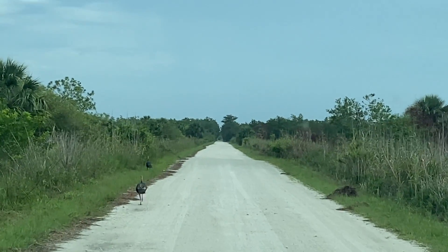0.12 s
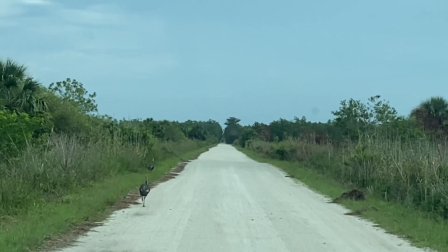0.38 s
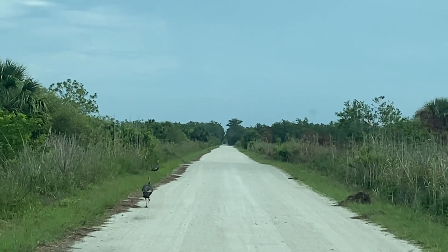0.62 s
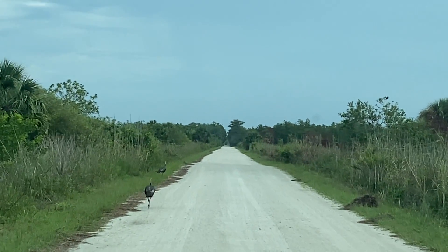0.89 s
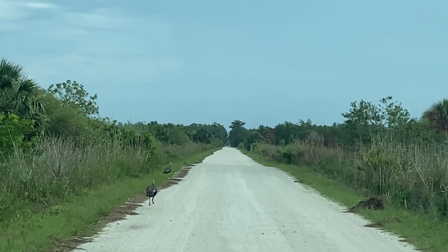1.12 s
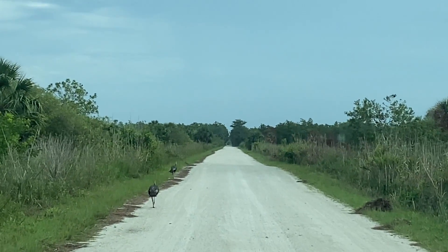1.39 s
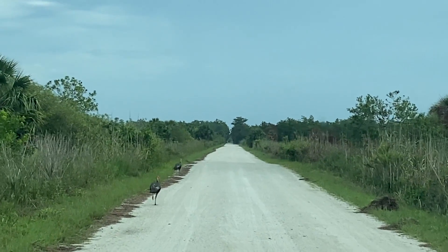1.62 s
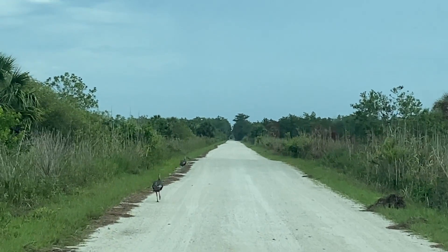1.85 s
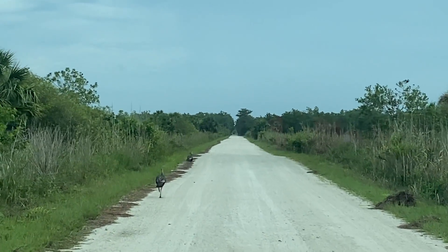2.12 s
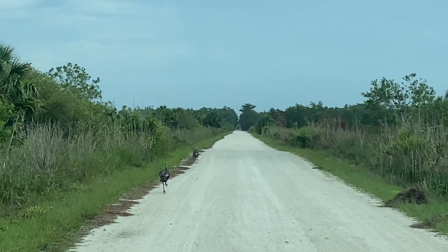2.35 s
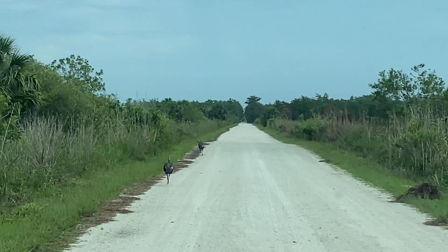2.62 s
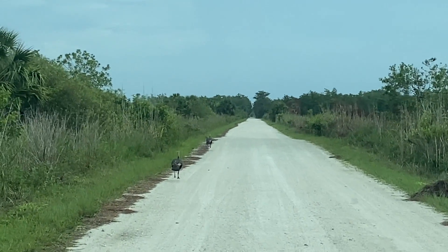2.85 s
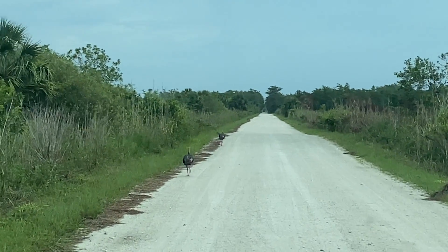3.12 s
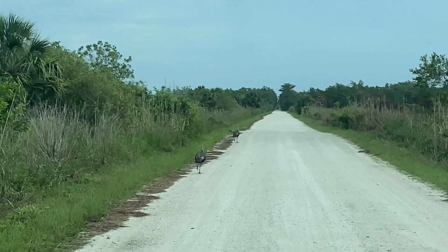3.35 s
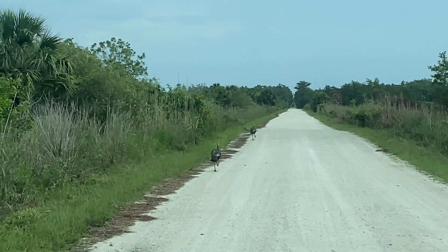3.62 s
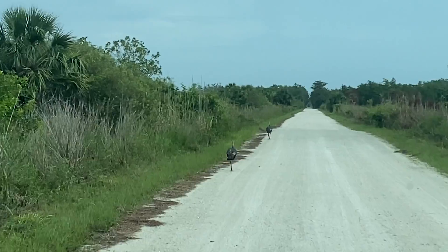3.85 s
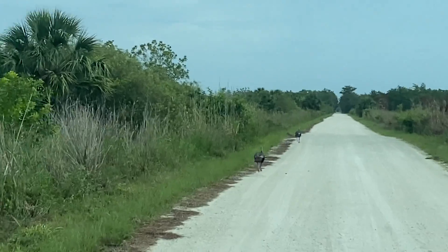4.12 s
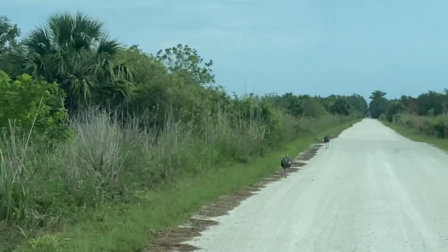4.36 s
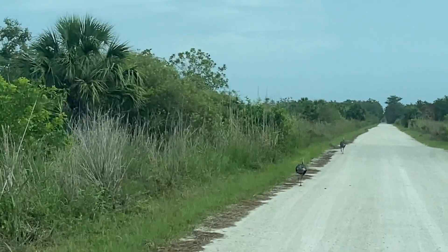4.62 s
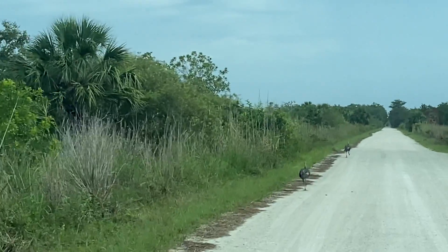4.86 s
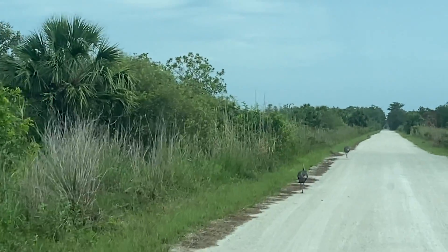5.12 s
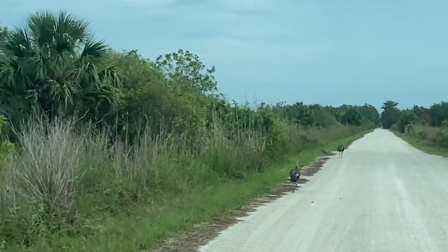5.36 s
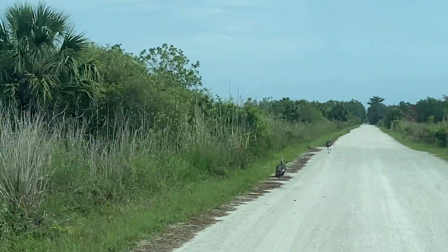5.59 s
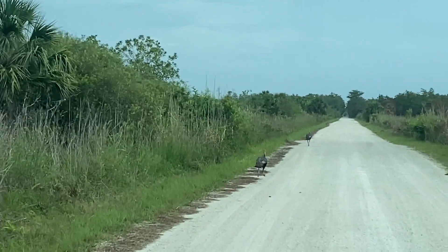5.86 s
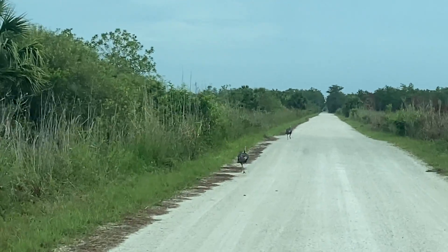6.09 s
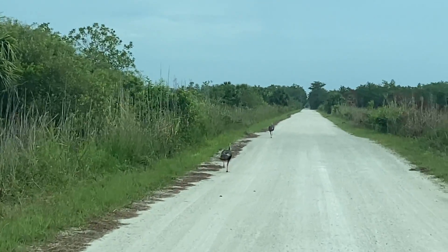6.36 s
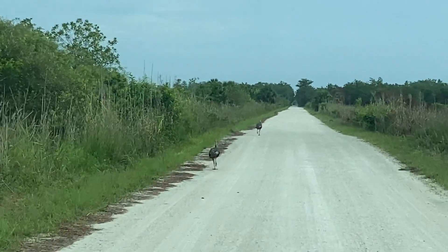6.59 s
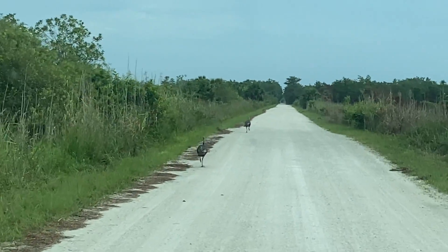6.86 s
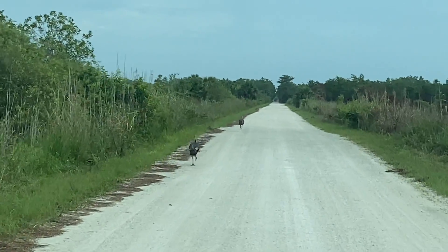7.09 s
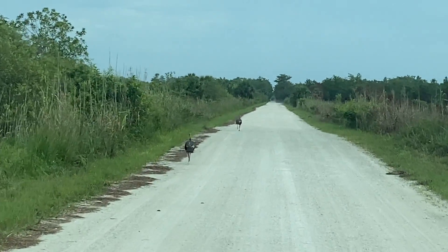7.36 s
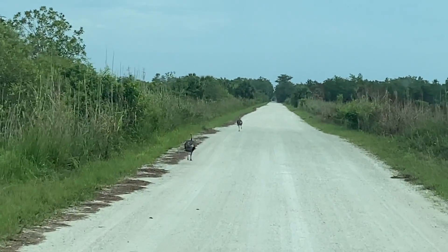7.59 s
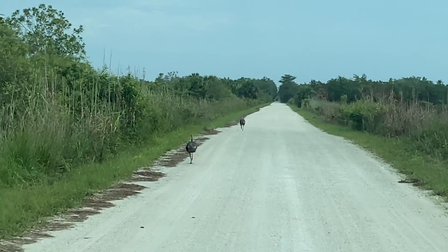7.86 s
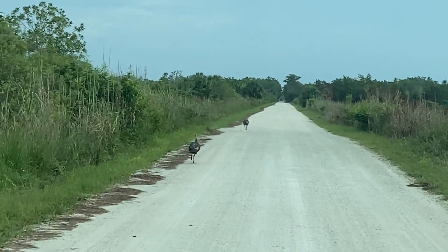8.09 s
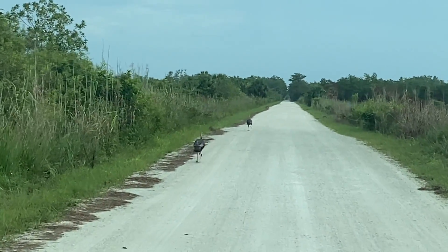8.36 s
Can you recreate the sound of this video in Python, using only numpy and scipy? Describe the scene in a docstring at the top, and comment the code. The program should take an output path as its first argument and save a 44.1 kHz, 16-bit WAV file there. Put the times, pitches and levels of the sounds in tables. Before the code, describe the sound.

A car's interior, heard on a phone behind the windscreen as it creeps along gravel. Throughout, deep, boomy body rumble and softer drumming dominate, over steady blower air, hollow cabin resonance and faint flickering hiss. A brighter hiss swells at the very start and fades within about a second. Faint high insect chirps dot the first 2.3 s, with three short rising calls, perhaps a distant bird, at about 0.6, 1.1 and 1.7 s. Rumble swells briefly near 1.1, 5.1 and 7.1 s. A small crisp cluster of ticks and stone pings falls around 2.3-2.5 s; isolated light ticks follow. The engine hum, nearly buried at first, strengthens from 2 s, wavers around 4-5 s, then grows fuller and slightly higher to the end. Dull gravel knocks and tiny pings come at 7.1-7.4 s, fainter knocks near 8 s, beneath a thin insect whine.

```python
"""Car creeping along a gravel road

Heard from a phone held behind the windscreen. Firing-order sines hum as the engine gains load; resonated
noise is the body shaken by the road, with brief swells and slight dips. Shaped noise is blower air, ringing
cabin resonances. Faint buzzing tones are insects and rising calls outside; decaying bursts and short notes
are ticks near the phone and stones on the underside. A flickering top hiss lies behind."""
import sys
import numpy as np
from scipy import signal
from scipy.fft import rfft, irfft
from scipy.io import wavfile
from scipy.ndimage import uniform_filter1d

SR = 44100
rng = np.random.default_rng(int(sys.argv[2]) if len(sys.argv) > 2 else 0)


def inscribe(sig):
    """Save sig as 16-bit PCM at rate SR to the path in sys.argv[1].

    A 1-D sig is mono; a 2-D sig holds one channel per row.
    Samples are clipped to [-1, 1] before scaling.
    """
    pcm = np.round(np.clip(np.atleast_2d(sig).T, -1, 1) * 32767)
    wavfile.write(sys.argv[1], SR, pcm.astype(np.int16))


def boost_factor(decibels):
    """Convert a level in decibels to a linear amplitude factor."""
    exponent = np.asarray(decibels, float) / 20
    return 10 ** exponent


N = 373520
T = np.arange(N) / SR
HZ = np.fft.rfftfreq(N, 1 / SR)


def curve(table, column):
    """One column of a time table at every sample."""
    table = np.array(table)
    return np.interp(T, table[:, 0], table[:, column])


def over_hz(table):
    """A (Hz, value) table at every frequency, straight on a log axis."""
    hz, value = np.transpose(table)
    return np.interp(np.log(HZ + 1), np.log(hz), value)


def unit(x):
    """Scale to rms 1."""
    return x / np.sqrt(np.mean(np.abs(x) ** 2))


def walk(rate_hz):
    """Random levels held 1 / rate_hz seconds, smoothed twice; rms 1."""
    step = 100
    hold = int(SR / step / rate_hz)
    held = rng.standard_normal(N // 1000)[np.arange(N // step) // max(hold, 11)]
    slow = unit(uniform_filter1d(uniform_filter1d(held, hold), hold))
    return np.interp(T, np.arange(len(slow)) * step / SR, slow)


def ring(hz, width_hz):
    """Noise through a resonance applied twice, as a rotating pointer of rms 1 in its real part."""
    # each pass is wider, so that the pair has about the stated width
    pole = np.exp((2j * np.pi * hz - np.pi * 1.5 * width_hz) / SR)
    lead_in = SR // 2
    noise = rng.standard_normal(N + lead_in)
    z = signal.lfilter([1], [1, -2 * pole, pole ** 2], noise)[lead_in:]
    return np.sqrt(2) * unit(z)


def resonances(table, wander_db, rate_hz):
    """Each resonance has its own noise, slides a little and has its own balance and phase at the two ports."""
    drift = .0025  # rms share of the pitch
    out = np.zeros((2, N))
    for hz, width_hz, db, pan_db, lead_rad in table:
        slide_rad = 2 * np.pi * hz * drift * np.cumsum(walk(rate_hz)) / SR
        level = boost_factor(db + wander_db * walk(rate_hz))
        z = ring(hz, width_hz) * np.exp(1j * slide_rad) * level
        out[0] += (z * (boost_factor(pan_db / 2) * np.exp(-.5j * lead_rad))).real
        out[1] += (z * (boost_factor(-pan_db / 2) * np.exp(.5j * lead_rad))).real
    return out


def even(x, span_s):
    """Level out swells slower than the span: a steady shaking of about rms 1."""
    span = int(span_s * SR)
    power = uniform_filter1d(uniform_filter1d(np.mean(x ** 2, axis=0), span), span)
    return x / np.sqrt(power)


def decay(strikes, t60_s):
    """Each strike falls exponentially, 60 dB in t60_s."""
    return signal.lfilter([1], [1, -np.exp(-np.log(1000) / (t60_s * SR))], strikes)


# Engine course. Each row: time in s, firing rate in Hz, hum level in dB before jolts.
ENGINE = [(0, 53, -47), (1.4, 52.6, -35), (2, 53.13, -32.5), (3.5, 55.1, -28), (3.95, 56.13, -30),
          (4.25, 60.1, -29), (4.65, 56.07, -26), (4.95, 54, -31), (5.2, 55, -25.5), (5.8, 57, -24),
          (6.25, 59.03, -22), (7.05, 60.65, -22), (7.7, 60.8, -23.5), (8.47, 61.4, -20.5)]
# Hum partials. Each row: multiple of the firing rate, level in dB relative to the hum.
ENGINE_ORDERS = [(1, -0.5), (2, -15), (3, -24.5), (4, -30.5)]


def engine():
    """Firing hum with a few overtones; the speed barely trembles."""
    firing_hz = curve(ENGINE, 1) * (1 + 0.0015 * walk(4))
    phase = 2 * np.pi * np.cumsum(firing_hz) / SR
    hum = sum(boost_factor(db + 0.88 * walk(5.0)) * np.sin(k * phase) for k, db in ENGINE_ORDERS)
    return np.sqrt(2) * hum * boost_factor(curve(ENGINE, 2))


# Road shake of the body. Each row: time in s, deep boom in dB, higher drumming in dB, both before jolts.
ROAD = [(0, -27.5, -31), (.7, -28, -29.5), (1.5, -27.5, -30), (2.4, -27, -29.5), (3.2, -24.5, -29.5),
        (4.1, -27.5, -30), (4.6, -26.5, -31), (4.95, -30.5, -33.5), (5.5, -26, -29.5), (6.4, -27.5, -32),
        (7.2, -27.5, -30), (7.6, -23.5, -30), (8.47, -28, -31)]
# Engine load: upper booms give way to the deep ones, the stone grumble comes and goes.
# Each row: time in s, booms above 55 Hz in dB relative to the deep ones, grumble in dB.
SHIFT = [(0, -1, -63), (1, 0, -61), (1.6, 0, -53), (2.3, 0, -59), (4.2, -3, -57), (4.8, 2, -54),
         (5.7, -3, -53), (6.2, -6, -57), (7, -6, -55), (8.47, -6, -58.5)]
# Deep body resonances, two below 55 Hz and two above. Each row: centre in Hz, width in Hz,
# relative level in dB, left minus right in dB, right lead in rad.
BOOM = [(35, 16, -8, 0, .08), (46.4, 10, -8, 0, .08), (63.5, 11, -4, 0, .08), (73.5, 14.5, -6, 0, .08)]


def boom():
    """Gravel under the tyres shakes the deep body resonances; load moves their balance."""
    deep = resonances(BOOM[:2], wander_db=2.0, rate_hz=4.1)
    upper = boost_factor(curve(SHIFT, 1)) * resonances(BOOM[2:], wander_db=2.5, rate_hz=4.09)
    return even(deep + upper, span_s=0.11) * boost_factor(curve(ROAD, 1))


# Higher body resonances. Each row: centre in Hz, width in Hz, relative level in dB,
# left minus right in dB, right lead in rad.
DRUM = [(99.6, 26, -5, .3, .15), (117, 12.3, -6, .3, 0.13), (127.7, 11.3, -6.5, .3, .13),
        (166.4, 15, -9, 5.1, 1.17), (191, 18.7, -12, .3, 0.27)]


def drum():
    """The same shaking drums on the higher body resonances."""
    return even(resonances(DRUM, wander_db=-0.1, rate_hz=5.8), span_s=0.13) * boost_factor(curve(ROAD, 2))


# Brief swells and slight dips of the road shake. Each row: time in s, peak change of the boom in dB.
JOLTS = [(.36, 5), (1.07, 9), (1.92, 5.5), (2.21, 2.5), (2.89, 1.5), (3.39, -1.5), (3.72, -0.5),
         (4.15, 2.5), (4.51, 2.5), (5.1, 8.5), (5.68, 0), (6.26, 4.5), (7.07, 6.5), (8.161, 2.5)]


def jolts():
    """Level change in dB: each row departs quickly and returns more slowly."""
    rise_s, fall_s = 0.077, 0.034  # time constants, multiplied together
    out = 0
    for s, db in JOLTS:
        age = np.clip(T - s, 0, None)
        shape = (1 - np.exp(-age / rise_s)) * np.exp(-age / fall_s)
        out = out + db * shape / shape.max()
    return out


def body():
    """Hum, boom and drumming all follow the jolts, by different shares of their dB."""
    jolt_db = jolts()
    return engine() * boost_factor(0.81 * jolt_db) + boom() * boost_factor(jolt_db) + drum() * boost_factor(0.44 * jolt_db)


def stone_grumble():
    """Loose stones: faint low band noise, independent at each port."""
    band = signal.butter(2, [280, 420], "bandpass", fs=SR, output="sos")
    noise = unit(signal.sosfilt(band, rng.standard_normal((2, N))))
    return boost_factor(curve(SHIFT, 2) + 1.1 * walk(7.3)) * noise


# Cabin resonances. Each row: centre in Hz, width in Hz, level in dB, left minus right in dB,
# right lead in rad.
CABIN = [(229.9, 19.4, -42.5, -2, 0.8), (257.8, 33, -45, 1.5, 1.4), (296.3, 35, -48.5, 7, 1.87),
         (369, 56, -58, -11, -0.67), (447.8, 38.6, -43, 2, 0.65), (498.2, 44, -46.5, 3.5, 1.18),
         (540.4, 29, -53.5, 0.5, 0.86), (596, 31, -51.5, -2.5, 1.8), (697, 72, -59, -4, 0.85),
         (767.7, 51.5, -49, -2.5, 0.23), (822, 34, -55.5, -1.5, 1.95), (974, 130, -61, -3, 0.48),
         (1139, 110, -59, 0, 0.5), (1303, 83, -57.5, -13, 2.14), (1432, 51, -60, -1, -1.2),
         (1739, 120, -61, 2, -2), (1887, 56, -65.5, 5.5, -1), (2055, 90, -64.5, 2.5, .1),
         (2227, 150, -60.5, 2.5, -0.25), (2550, 110, -66.5, -2, 0), (2843, 70, -64.5, 0, 0.13),
         (2992, 59, -69, -3.5, 0.05), (3252, 210, -67.5, 2, 0), (3680, 96, -69, -1, 0),
         (4010, 190, -70.5, -1.5, 0), (4260, 150, -68, -0.5, 0), (4844, 90, -72, -0.5, 0),
         (5080, 130, -73, -1.5, 0), (5420, 92, -75, -1.5, 0), (6040, 420, -79, -0.5, 0)]
# Air rush spectrum. Each row: frequency in Hz, density in dB per Hz.
AIR = [(20, -72.5), (120, -69), (250, -66.5), (400, -75.5), (650, -77), (880, -83.5), (1600, -90.5),
       (2600, -92), (3500, -95), (4600, -96), (5700, -103), (7000, -105), (7600, -106.5), (8300, -116),
       (8600, -150)]
# Each row: frequency in Hz, left-right likeness of the rush from 0 to 1.
AIR_LIKENESS = [(100, 0.96), (250, 0.9), (400, 0.8), (900, 0.8), (1700, .05), (2000, 1), (2350, .998),
                (2600, 1), (2900, 0.94), (3350, 1)]
# Fan tones. Each row: frequency in Hz, level in dB.
BLOWER_WHINE = [(686, -64.5), (917, -64.5), (3151, -73.5)]


def blower():
    """Air rush, alike at both ports in bass and treble, the cabin it rings and the fan's thin whine."""
    likeness = np.clip(over_hz(AIR_LIKENESS), 0, 1)
    density = boost_factor(over_hz(AIR)) * np.sqrt(SR / 2)
    mid = rfft(rng.standard_normal(N)) * density
    side = rfft(rng.standard_normal(N)) * density
    mid = irfft(mid * np.sqrt((1 + likeness) / 2), N)
    side = irfft(side * np.sqrt((1 - likeness) / 2), N)
    rush = np.array([mid + side, mid - side]) * boost_factor(0.99 * walk(6))
    whine = np.zeros(N)
    for hz, db in BLOWER_WHINE:
        phase = 2 * np.pi * hz * np.cumsum(1 + 0.0018 * walk(2.5)) / SR
        whine += boost_factor(db + 1.7 * walk(3.3)) * np.sin(phase)
    return rush + resonances(CABIN, wander_db=0.8, rate_hz=5) + np.sqrt(2) * whine


# Bands of the rush that come and go, perhaps as the phone turns in the hand. Each row: centre in Hz,
# width in Hz, level in dB, left minus right in dB, right lead in rad, start in s, end in s.
PASSING = [(1315, 90, -54, -11, 2.1, -1, 5.9), (1290, 100, -56, -11, 2.1, 7.1, 9),
           (1430, 70, -63, 5, -1.2, 3.2, 9), (1560, 70, -59, 0, 2.6, 5.7, 7.7),
           (1550, 60, -63, 0, 2.6, 4.5, 5.4), (1370, 130, -57, -3, .3, 5.4, 7.4),
           (1850, 150, -63, 2, -.5, -1, .9), (820, 50, -60, 0, 2.0, 3.6, 9),
           (4370, 80, -71, 0, 0, 2.7, 4.4), (4600, 200, -73, 0, 0, -1, 2.6), (4840, 60, -72, 0, 0, 7.05, 9),
           (5150, 50, -75, 0, 0, 6.9, 8.3), (6900, 200, -79, 0, 0, 7.1, 9), (6500, 700, -76, 0, 0, -1, 2.2)]


def passing_bands():
    """Narrow noise bands, each faded in and out over 0.27 s."""
    out = np.zeros((2, N))
    for *mode, start, end in PASSING:
        fade = np.clip(np.minimum(T - start, end - T) / 0.27, 0, 1)
        out += fade * resonances([mode], wander_db=2.0, rate_hz=3.5)
    return out


# Gravel on the underside. Each row: time in s, level in dB.
KNOCKS = [(7.116, -47), (7.362, -52), (7.387, -51), (7.99, -53), (8.09, -53)]


def knocks():
    """Dull gravel knocks: short decaying noise bursts in the middle range."""
    strikes = np.zeros(N)
    for s, db in KNOCKS:
        strikes[int(s * SR)] = boost_factor(db)
    shape = decay(strikes, t60_s=.06)
    band = signal.butter(3, [1300, 3600], "bandpass", fs=SR, output="sos")
    noise = rng.standard_normal(N)
    return signal.sosfilt(band, shape * noise) / np.std(signal.sosfilt(band, noise))


# Small stones on the underside. Each row: time in s, pitch in Hz, peak in dB, ring t60 in s.
PINGS = [(2.3432, 5000, -48, .015), (2.3458, 5250, -45, .018), (2.3458, 4150, -46, .02),
         (7.296, 5350, -52, .045), (7.315, 5060, -56, .06), (7.353, 3150, -49, .045)]


def pings():
    """Each stone rings one short decaying sine."""
    out = np.zeros(N)
    for s, hz, db, t60_s in PINGS:
        age = np.arange(int(t60_s * SR)) / SR
        note = boost_factor(db - 60 * age / t60_s) * np.sin(2 * np.pi * hz * age)
        out[int(s * SR):][:len(age)] += note
    return out


# Ticks and short rustles near the phone. Each row: time in s, top level in dB, upper-middle level in dB.
TICKS = [(1.8567, -62, -66), (2.0602, -70, -66), (2.3426, -52, -51), (2.4524, -59, -65), (2.4594, -59, -66),
         (2.4664, -59, -62), (2.478, -61, -66), (2.5157, -60, -57), (2.5304, -60, -63), (3.1294, -68, -62),
         (3.459, -65, -63), (4.4986, -67, -60), (4.913, -62, -64), (5.3494, -71, -61), (6.542, -65.5, -68),
         (6.9724, -74, -73), (7.3003, -72, -66), (7.3536, -70, -55), (7.5901, -71, -64), (7.9149, -64, -58)]
HISS_FROM_HZ = 7600  # splits the ticks into upper middle and top


def tick_shape(low):
    """Sudden rise and decay of every tick; the lower part dies faster."""
    strikes = np.zeros(N)
    for s, top_db, middle_db in TICKS:
        strikes[int(s * SR)] = boost_factor(middle_db if low else top_db)
    return decay(strikes, t60_s=0.037 if low else 0.046)


def ticks_low():
    """Upper-middle noise part of each tick, the same at both ports."""
    band = signal.butter(4, [3700, HISS_FROM_HZ], "bandpass", fs=SR, output="sos")
    return tick_shape(low=True) * unit(signal.sosfilt(band, rng.standard_normal(N)))


def chirp(buzz, buzz_hz, s, length_s, start_hz, end_hz, db):
    """A tone inside a narrow buzzing band, moved to its pitch; it can glide and throbs at 95 Hz."""
    out, span = np.zeros(N), slice(int(s * SR), int((s + length_s) * SR))
    t = T[span]
    age = np.clip((t - s) / length_s, 0, 1)
    throb = 1 + 0.2 * np.sin(2 * np.pi * 95 * (t - s))
    shift_hz = start_hz - buzz_hz + (end_hz - start_hz) * age
    shift = np.exp(2j * np.pi * np.cumsum(shift_hz) / SR)
    tone = np.exp(2j * np.pi * buzz_hz * t) * .9 + .8 * buzz[span]
    envelope = np.abs(np.sin(np.pi * age)) ** 0.24
    out[span] = boost_factor(db) * envelope * throb * (tone * shift).real
    return out


# Insect chirps. Each row: start in s, length in s, pitch in Hz, level in dB.
CHIRPS = [(0.048, .12, 6400, -66), (.14, .079, 6650, -70), (0.277, 0.065, 6400, -67), (.53, 0.1, 6340, -67),
          (.755, .09, 6350, -67), (1.03, .08, 6350, -74), (1.27, 0.09, 6340, -72), (1.49, .08, 6370, -75),
          (1.73, .08, 6350, -73), (1.96, .09, 6350, -72), (2.24, .07, 6350, -74), (8.301, 0.077, 6300, -72)]


def insects():
    """High chirps of level pitch, cut from one narrow buzz."""
    centre_hz, width_hz = 6350, 220
    buzz = ring(centre_hz, width_hz)
    return sum(chirp(buzz, centre_hz, s, length_s, hz, hz, db) for s, length_s, hz, db in CHIRPS)


# Lower calls, perhaps a far bird. Each row: start in s, level in dB.
CALLS_LOW = [(.575, -64), (1.125, -56.5), (1.675, -58.5)]


def rising_calls():
    """Short calls below the chirps, gliding upwards."""
    length_s, start_hz, end_hz, width_hz = .085, 3560, 3950, 320
    buzz = ring(start_hz, width_hz)
    return sum(chirp(buzz, start_hz, s, length_s, start_hz, end_hz, db) for s, db in CALLS_LOW)


def insect_whine():
    """A thin sine song that swells in near the end and wavers a little."""
    pitch_hz, peak_db, from_s = 4835, -65.5, 7.17
    phase = 2 * np.pi * pitch_hz * np.cumsum(1 + .004 * walk(14)) / SR
    fade = np.clip((T - from_s) / .15, 0, 1)
    return fade * boost_factor(peak_db + 2 * walk(12)) * np.sin(phase)


def top_hiss():
    """Flickering hiss, fine grit and tick tops; the left port lags, so some bands arrive opposed."""
    bed_db, swell_db = -74.5, -62  # swell before its rise and fade
    rise_s, fade_s = 0.15, 0.43
    opposed_hz, left_lag_s = 9070, 1 / 4270
    grit = np.zeros(N)
    when, size = rng.random((2, 500))
    grit[(when * N).astype(int)] = boost_factor(13 * size)
    grit = signal.lfilter([1], [1, -np.exp(-1 / (.004 * SR))], grit)
    swell = boost_factor(swell_db) * (1 - np.exp(-T / rise_s)) * np.exp(-T / fade_s)
    flicker = boost_factor(0.64 * walk(11) + .4 * walk(1.8))
    level = (boost_factor(bed_db) + swell) * flicker * (1 + 0.12 * grit) + tick_shape(low=False)
    band = signal.ellip(8, .2, 60, HISS_FROM_HZ, "highpass", fs=SR, output="sos")
    bright = unit(signal.sosfilt(band, rng.standard_normal(N)))
    dull = np.clip(.05 + 0.32 * T, 0, .75)  # starts bright, dulls as the swell fades
    right = level * (bright + dull * np.roll(bright, 1)) / (1 - 0.5 * (1 - dull))
    turn = np.exp(-2j * np.pi * (HZ - opposed_hz) * left_lag_s)
    left = -irfft(rfft(right) * turn, N)
    return np.array([left, right])


def scene():
    """All sources at the two ports."""
    return (body() + stone_grumble() + blower() + passing_bands() + knocks() + pings() + ticks_low()
            + insects() + rising_calls() + insect_whine() + top_hiss())


def low_pass(x):
    """Removes everything above the highest recorded frequency."""
    return signal.sosfilt(signal.butter(12, 16730, fs=SR, output="sos"), x)


def record(dry):
    """The phone cuts the very top and the deepest bass; the end closes softly."""
    top_hz, low_hz, close_s = 15700, 26, .012
    dry = signal.sosfilt(signal.ellip(10, .2, 70, top_hz, fs=SR, output="sos"), dry)
    dry = signal.sosfilt(signal.butter(2, low_hz, "highpass", fs=SR, output="sos"), dry)
    close = np.sin(np.pi / 2 * np.clip((T[-1] - T) / close_s, 0, 1)) ** 2
    return low_pass(dry * close)


dry = scene()
out = record(dry)
inscribe(out)
```